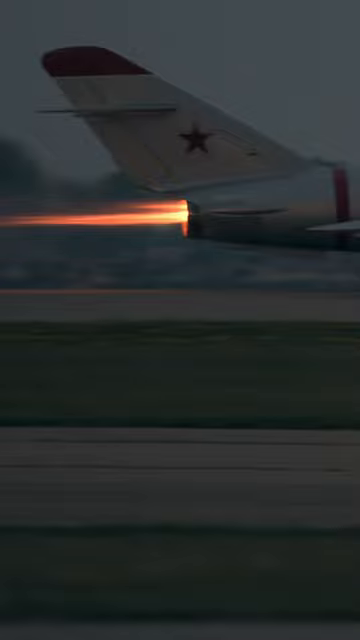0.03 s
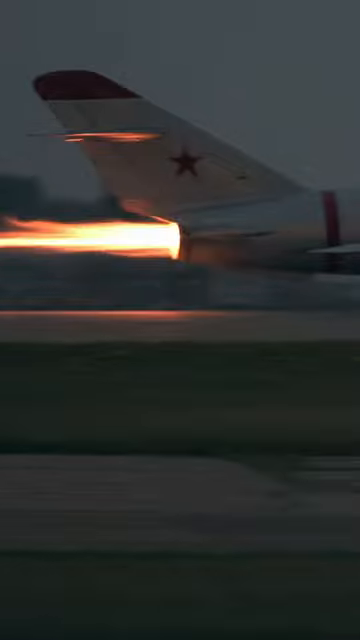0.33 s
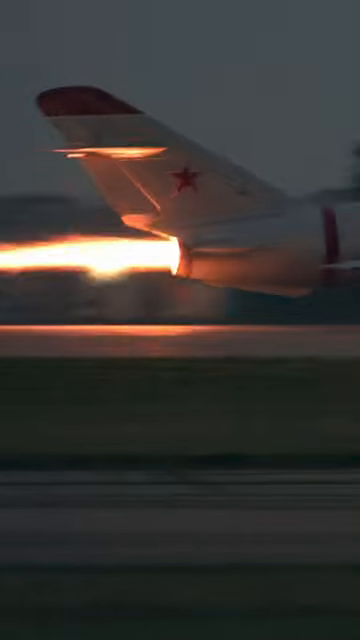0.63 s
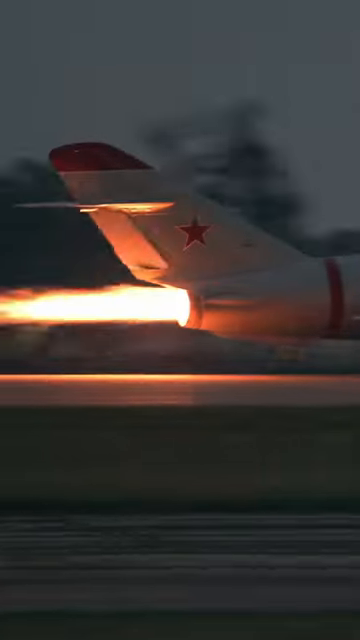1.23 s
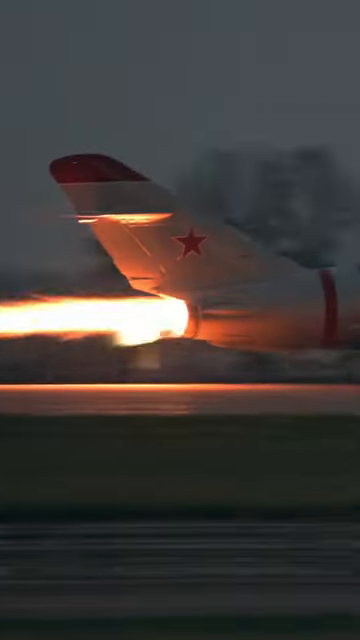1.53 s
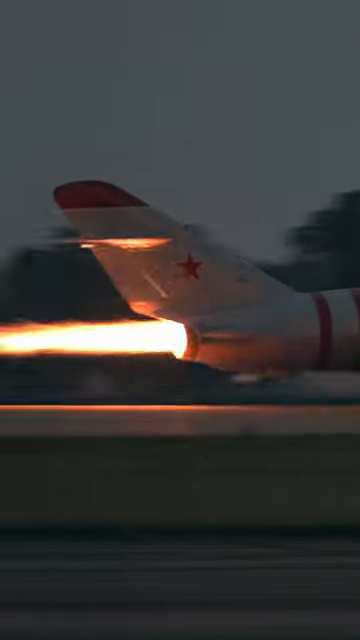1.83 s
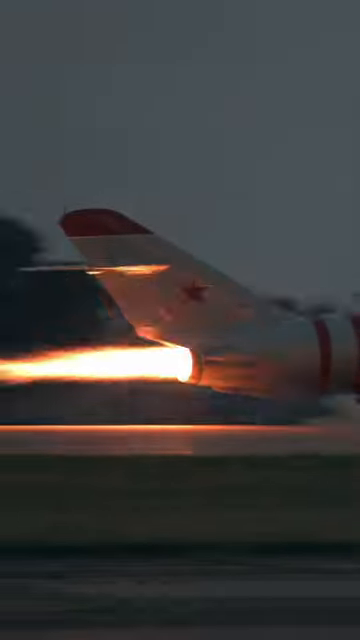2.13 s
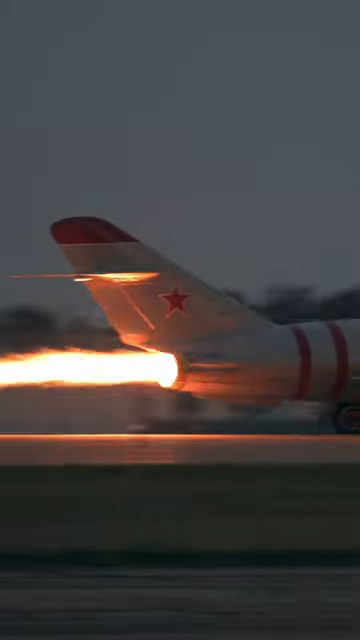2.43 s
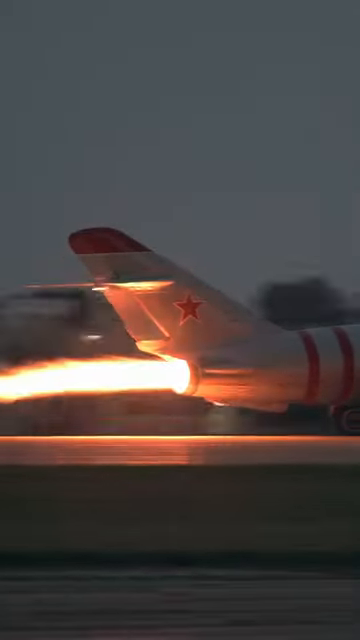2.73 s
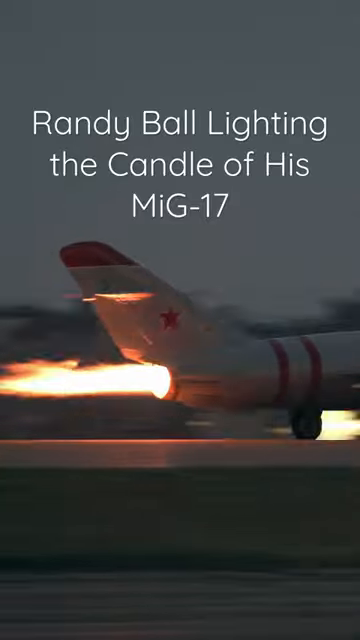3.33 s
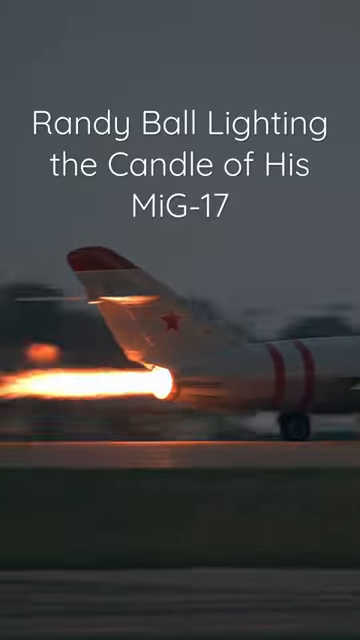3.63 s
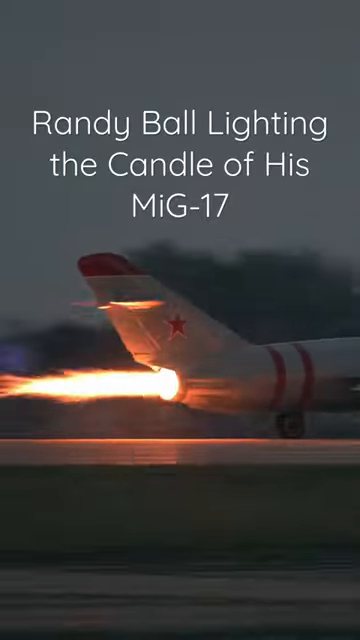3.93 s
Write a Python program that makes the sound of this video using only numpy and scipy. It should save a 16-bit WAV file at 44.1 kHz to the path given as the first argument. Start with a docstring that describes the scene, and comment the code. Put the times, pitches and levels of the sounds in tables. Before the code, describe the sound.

A fighter jet's afterburner roars loudly along an outdoor runway. Its dense rasp grows into sharp, separate cracks as a low rumble and hollow growl swell. The left channel briefly drops out near the start.

```python
"""A loud jet roar cuts in: a fighter runs along a runway on afterburner.
Its churning exhaust makes the roar, and as it turns towards the listener a low rumble and a hollow
growl swell. Shock waves (sudden jumps in air pressure) grow from a dense rasp into separate cracks.
A faint whistle fades early, and two close echoes colour the sound. A fast limiter holds the peaks;
the left channel drops out for a moment near the start and comes back with a click."""
import sys
import numpy as np
from scipy import signal
from scipy.fft import rfft, irfft
from scipy.io import wavfile
from scipy.ndimage import uniform_filter1d, minimum_filter1d, map_coordinates

SR = 44100
rng = np.random.default_rng(int(sys.argv[2]) if len(sys.argv) > 2 else 0)


def transcribe(signal):
    """Save signal, clipped to [-1, 1], as a 16-bit WAV file at the path in sys.argv[1]."""
    frames = np.atleast_2d(signal).T
    limited = np.clip(frames, -1, 1)
    pcm = np.round(limited * 32767).astype(np.int16)
    wavfile.write(sys.argv[1], SR, pcm)


N = 176400
HZ = np.fft.rfftfreq(N, 1 / SR)  # the pitch of each slot in a spectrum


# How loud the roar is: time_s, level_db
ROAR_LEVEL = [(0, -21), (.3, -19.5), (.8, -19.5), (1.1, -20.5), (1.7, -20.5), (2.4, -20.5), (2.65, -23.5),
              (3, -24.5), (3.6, -25.5), (4, -23.5)]
# The roar's tone, from bass to treble: pitch_hz, level_db
ROAR_TONE = [(20, -26), (120, -9.5), (300, -7), (500, -3), (850, -1.5), (1200, -3), (2100, 1), (2700, -2),
             (3400, -6), (4500, -12.5), (6000, -18.5), (8000, -24), (11000, -34), (16000, -60)]
# How alike the roar is in the two ears: pitch_hz, likeness (1 = the same)
ROAR_LIKENESS = [(20, .999), (1600, 1), (2400, 0.98), (3500, 0.83), (7000, 0.78), (11000, 0.46),
                 (16000, .15)]

def roar():
    """Tiny swirls in the exhaust make a broad rush, its treble different in each ear."""
    likeness = np.clip(over_hz(ROAR_LIKENESS), 0, 1)
    left = white()
    right = likeness * left + np.sqrt(1 - likeness ** 2) * white()
    rush = stereo(np.array([left, right]) * amp(over_hz(ROAR_TONE)))
    return unit(rush) * amp(over_time(ROAR_LEVEL))


# The stream of shocks: time_s, level_db, size_spread_db
CRACKLE_LEVEL = [(0, -29.5, -2), (.14, -25.5, 3), (.3, -29, 2.5), (.62, -26.5, 2.5), (.96, -32, 1.5),
                 (1.05, -26, 2), (1.27, -29.5, 2), (1.58, -27.5, 4), (1.7, -24, 4.5), (1.8, -29.5, 6.5),
                 (1.93, -23, 3.7), (2.2, -26.5, 4.5), (2.36, -24, 3), (2.46, -23, 5), (2.55, -27, 5.5),
                 (2.74, -26, 2), (2.79, -24.5, 4), (3.35, -23.5, 3.5), (3.52, -25, 4), (3.62, -27, 5),
                 (3.76, -25, 4.5), (4, -27, 4)]
# The loudest single cracks, plus a click at 0.85 s as the left channel comes back: start_s, peak_db
CRACKS_AND_CLICK = [(.72, -7), (0.8512, -5), (1.403, -13), (1.648, -8), (1.676, -10), (1.9348, -1),
                    (2.1094, -4), (2.1586, -6), (2.269, -8), (2.373, -6.5), (2.469, 2), (2.4798, -6),
                    (2.5052, -3), (2.775, 6), (2.796, -15), (2.861, -10), (2.9632, -5), (2.98, -6),
                    (3.0116, 0), (3.06, -7), (3.119, -9), (3.1317, -8), (3.146, -2), (3.183, -8),
                    (3.251, -4), (3.319, -4), (3.3338, -6), (3.373, -7), (3.3855, -3), (3.525, -6),
                    (3.5956, -6), (3.662, -5), (3.7277, -9), (3.7382, -9), (3.7834, 3), (3.802, -12),
                    (3.8367, -7)]
# The tone of one shock: pitch_hz, level_db
SHOCK_TONE = [(20, -22), (120, 4), (300, -6), (500, -1.5), (850, 0), (1300, -2), (2200, 2.5), (3400, -2),
              (4600, -7), (6300, -13.5), (8000, -17), (11000, -23.5), (16000, -35.5)]

def crackle(shocks_per_s=1700, clump_db=1.4, edge_hz=5460, crack_edge_db=5):
    """Shock waves arrive as clumps of clicks, mostly small, a few very large and sharp."""
    hits = rng.random(N) < shocks_per_s / SR
    size_db = over_time(CRACKLE_LEVEL, column=2) * np.minimum(rng.exponential(1, N), 5.4)
    size_db += clump_db * waver(top_hz=45)
    # A shock has a low body and a high edge; the body's size varies a little more.
    body = spread(steady(hits * amp(.93 * size_db)))
    edge = spread(steady(hits * amp(.83 * size_db)))
    low = 1 / (1 + (HZ / edge_hz) ** 4)
    shock = sharpest_click(SHOCK_TONE)
    rasp = unit(stereo((body * low + edge * (1 - low)) * shock)) * amp(over_time(CRACKLE_LEVEL))
    peaks = np.zeros(N)
    for start_s, peak_db in CRACKS_AND_CLICK:
        peaks[round(start_s * SR)] = amp(peak_db)
    bright_click = shock * (low + amp(crack_edge_db) * (1 - low))
    cracks = stereo(rfft(peaks) * bright_click / irfft(bright_click, N).max())
    return scatter(rasp + cracks)


def spread(clicks, spread_s=1.7e-5, alike_below_hz=3800):
    """Shocks come from all along the exhaust, so each gets one of five lags between the ears."""
    lags_s = np.linspace(-1, 1, 5) * np.sqrt(2) * spread_s
    direction = rng.integers(0, len(lags_s), N)
    treble = HZ ** 2 / (HZ ** 2 + alike_below_hz ** 2)
    turn = np.array([[1j], [-1j]]) * np.pi * HZ * treble
    return sum(rfft(clicks * (direction == k)) * np.exp(turn * lag) for k, lag in enumerate(lags_s))


# Swells of treble as the jet passes: time_s, gain_db
TREBLE_GAIN = [(0, 0), (.13, 2.5), (.26, -1), (.55, 0), (.75, -1), (.96, -0.5), (1.05, 0.5), (1.22, -1),
               (1.5, 2), (1.6, -1.5), (1.7, 2), (1.82, -0.5), (1.93, -1), (2.05, -3), (2.27, -.3),
               (2.35, 2.5), (2.5, -2), (2.72, -2), (2.79, -1), (2.88, -2), (3.02, -1), (3.5, -1.5),
               (3.61, -3.5), (3.74, -.5), (4, -0.5)]
# The highest sizzle, faint at first and brighter from about 1.7 s: time_s, gain_db
SIZZLE_GAIN = [(0, -5), (1.2, -1), (1.7, 3), (2.5, 1.5), (4, 3)]

def brighten(sound, treble_hz=6000, sizzle_hz=12900):
    """The treble swells as the shock waves get steeper; the sizzle above it starts faint and grows."""
    for corner_hz, gain in ((treble_hz, TREBLE_GAIN), (sizzle_hz, SIZZLE_GAIN)):
        highs = irfft(rfft(sound) / (1 + (corner_hz / (HZ + 1)) ** 8), N)
        sound = sound + highs * (amp(over_time(gain)) - 1)
    return sound


# The rumble's surges: time_s, level_db
RUMBLE_LEVEL = [(0, -29.5), (.16, -27), (.35, -28.5), (.48, -27), (.7, -29), (.9, -25), (1.05, -28),
                (1.15, -24), (1.32, -26), (1.45, -24), (1.62, -23), (1.9, -25.5), (1.97, -19.5),
                (2.02, -23), (2.07, -19.5), (2.15, -22), (2.21, -27.5), (2.26, -18), (2.32, -19.5),
                (2.38, -20), (2.44, -19), (2.57, -22), (2.63, -18), (2.8, -18.5), (2.99, -22),
                (3.11, -17.5), (3.18, -18), (3.23, -13), (3.36, -16.5), (3.43, -15), (3.5, -20),
                (3.69, -15), (3.78, -16), (4, -14)]
# The rumble's tone: pitch_hz, level_db
RUMBLE_TONE = [(20, -42), (35, -30), (50, -19), (75, -8.5), (100, -4.5), (126, 0.2), (150, -1.5), (180, -2),
               (210, -5.5), (245, -8.5), (285, -19.5), (420, -24), (900, -57), (16000, -95)]

def rumble(even_s=.15, gust_db=.36):
    """Large swirls in the exhaust make a lumpy low noise, the same in both ears."""
    swirls = noise(RUMBLE_TONE)
    # Even out slow chance swells, so that the table sets the surges.
    window = np.hanning(int(2 * even_s * SR))
    power = signal.fftconvolve(swirls ** 2, window, "same")
    power /= signal.fftconvolve(np.ones(N), window, "same")
    level_db = over_time(RUMBLE_LEVEL) + gust_db * waver(top_hz=22)
    return swirls / np.sqrt(abs(power) + 1e-12) * amp(level_db)


# The growl grows as the exhaust turns towards the listener: time_s, level_db
GROWL_LEVEL = [(0, -40), (.8, -46), (1.3, -32), (2.0, -29.5), (2.65, -30.5), (2.8, -24), (3.2, -29),
               (3.6, -24.5), (4, -29.5)]
# The growl's hollow tone: pitch_hz, level_db
GROWL_TONE = [(20, -33), (200, -9), (320, 3), (520, 0), (680, -3), (880, 2), (1100, -7.5), (1650, -7),
              (2600, -13.5), (16000, -56)]

def growl():
    """Middle-sized swirls send their sound out behind the jet."""
    return unit(noise(GROWL_TONE)) * amp(over_time(GROWL_LEVEL))


# The tone of the deepest rumble: pitch_hz, level_db
DEEP_TONE = [(20, -8), (40, -5), (70, 1), (115, 0), (200, -16), (900, -55), (16000, -95)]

def deep_rumble(level_db=-36.5):
    """The largest swirls sound in all directions, so their level holds as the jet passes."""
    return amp(level_db) * unit(noise(DEEP_TONE))


# How loud the whistle is: time_s, level_db
WHISTLE_LEVEL = [(0, -35.5), (.6, -35.5), (1.1, -44), (4, -50)]

def whistle(pitch_hz=3438, width_hz=45):
    """A narrow, breathy band of noise fades as the exhaust turns."""
    band = white() / (1 + ((HZ - pitch_hz) / width_hz) ** 2) ** 2
    return unit(stereo(band)) * amp(over_time(WHISTLE_LEVEL))


def scatter(shocks, above_hz=3720, hiss_db=-8, fade_s=.12):
    """The surroundings answer each shock's treble with a short hiss that dies away."""
    treble = signal.sosfilt(signal.butter(4, above_hz, "high", fs=SR, output="sos"), shocks)
    decay = np.exp(-2 * np.log(1000) / (fade_s * SR))  # falls 60 dB in fade_s
    power = signal.lfilter([1 - decay], [1, -decay], (treble ** 2).mean(0))
    tone = np.sqrt(abs(uniform_filter1d(abs(rfft(treble)) ** 2, size=2001)))
    hiss = unit(irfft(np.array([white(), white()]) * tone, N))
    return shocks + amp(hiss_db) * np.sqrt(power) * hiss


# The bright echo as the jet passes: time_s, delay_ms, relative_strength
BRIGHT_ECHO = [(0, 2.17, .2), (.3, 2.165, .25), (.6, 2.115, .28), (1.1, 2.035, .3), (1.5, 2.012, .3),
               (1.9, 2.015, .28), (2.5, 2.06, .2), (3, 2.07, .18), (3.4, 2.09, .1), (4, 2.2, .12)]

def bright_echo(sound, gain_db=-3.5, strongest_hz=5640):
    """A small surface nearby throws back the treble; its drifting delay makes a slow swish."""
    ratio = HZ / strongest_hz
    bright = irfft(rfft(sound) * 2j * ratio / (1 + ratio ** 2), N)
    earlier = np.arange(N) - over_time(BRIGHT_ECHO) * SR / 1000
    echo = np.array([map_coordinates(ear, [earlier], order=3) for ear in bright])
    return sound + amp(gain_db) * over_time(BRIGHT_ECHO, column=2) * echo


# How late the dull echo comes: time_s, delay_ms
DULL_ECHO = [(0, 2.94), (.8, 3.06), (2, 2.77), (4, 3.06)]

def dull_echo(sound, share=.29, below_hz=2120):
    """A close, upside-down echo weakens evenly spaced pitches that drift as the jet moves."""
    samples = np.arange(N)
    dull = irfft(rfft(sound) * share / (1 + (HZ / below_hz) ** 2), N)
    earlier = samples - over_time(DULL_ECHO) * SR / 1000
    return sound - np.array([np.interp(earlier, samples, ear) for ear in dull])


# How much louder the left ear is than the right: pitch_hz, difference_db
LEFT_LOUDER = [(20, 0), (700, -.1), (1500, -.5), (1900, 0), (2400, -2.5), (3500, -1), (5000, 1.2),
               (9500, 2.5), (16000, 2)]
# How far the wave at the left ear is ahead: pitch_hz, lead_radians
LEFT_AHEAD = [(20, -1), (1800, -0.19), (2500, 0.1), (3400, 0.72), (7000, 0.93), (11000, 0.9), (13000, 1.2),
              (16000, 2)]

def stereo(spectrum):
    """Turns a spectrum into left and right sound, slightly apart in level and timing."""
    side = np.array([[.5], [-.5]])
    return irfft(spectrum * amp(side * over_hz(LEFT_LOUDER)) * np.exp(1j * side * over_hz(LEFT_AHEAD)), N)


def amp(db):
    """Turns decibels into a gain."""
    return 10 ** (np.asarray(db) / 20)


def unit(sound):
    """Scales a sound to an average power of 1."""
    return sound / np.sqrt(np.mean(sound ** 2) + 1e-20)


def over_time(table, column=1):
    """Reads one column of a time table at every sample."""
    rows = np.array(table)
    return np.interp(np.arange(N) / SR, rows[:, 0], rows[:, column])


def over_hz(table):
    """Reads a pitch table at every pitch in HZ."""
    pitch_hz, value = np.transpose(table)
    return np.interp(np.log(HZ + 1), np.log(pitch_hz + 1), value)


def white():
    """The spectrum of fresh white noise, an even hiss."""
    return rfft(rng.standard_normal(N))


def noise(tone):
    """Noise shaped by a tone table."""
    return irfft(white() * amp(over_hz(tone)), N)


def waver(top_hz):
    """A slow random wobble, from about 2 Hz up to top_hz."""
    return unit(irfft(white() * HZ / (HZ + 2) ** 1.5 / (1 + (HZ / top_hz) ** 4), N))


def sharpest_click(tone):
    """The spectrum of a click with this tone and the most sudden start (minimum phase)."""
    cepstrum = irfft(np.log(amp(over_hz(tone))), N)
    cepstrum[1:N // 2] *= 2
    cepstrum[N // 2 + 1:] = 0
    return np.exp(rfft(cepstrum))


def steady(clicks):
    """Centres a stream of clicks on zero and evens out its power."""
    clicks = clicks - uniform_filter1d(clicks, size=1201)
    return clicks / np.sqrt(uniform_filter1d(clicks ** 2, size=4001) + 1e-12)


def scene(gust_db=.08):
    """All the exhaust's sounds, wavering in the moving air, with two close echoes."""
    upper = growl() + whistle() + bright_echo(brighten(roar() + crackle()))
    return dull_echo(rumble() + upper * amp(gust_db * waver(top_hz=22)) + deep_rumble())


def record(dry, low_cut_hz=52, high_cut_hz=15830, ceiling_db=-4, limiter_s=.0057):
    """Trims the lowest and highest pitches, holds down peaks, cuts in and briefly mutes the left."""
    start_s, left_off_s, left_on_s = .037, .246, .852
    time_s, span = np.arange(N) / SR, int(limiter_s * SR)
    dry = signal.sosfilt(signal.butter(2, low_cut_hz, "high", fs=SR, output="sos"), dry)
    safe_gain = np.minimum(amp(ceiling_db) / (abs(dry).max(0) + 1e-9), 1)
    limited = dry * uniform_filter1d(minimum_filter1d(safe_gain, span), span)
    limited *= time_s >= start_s
    limited[0] *= (time_s < left_off_s) | (time_s >= left_on_s)
    high_cut = signal.firwin(511, high_cut_hz, window=("kaiser", 9), fs=SR)
    return signal.oaconvolve(limited, high_cut[None], "same")


dry = scene()
out = record(dry)
transcribe(out)
```